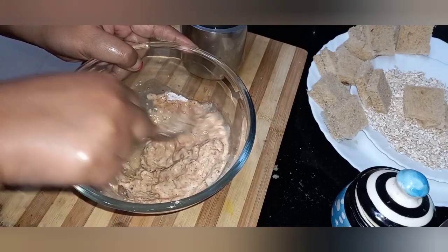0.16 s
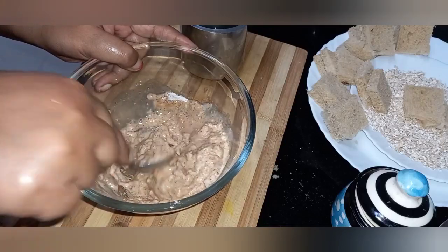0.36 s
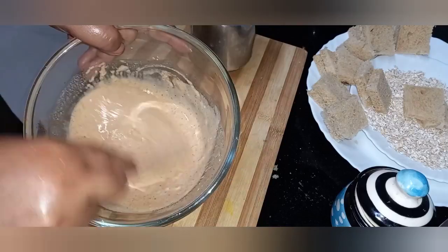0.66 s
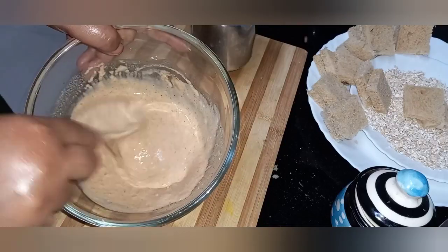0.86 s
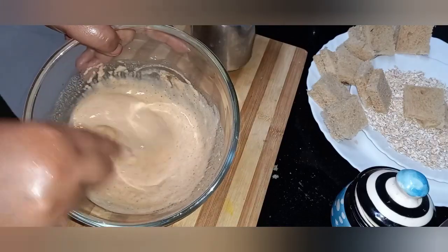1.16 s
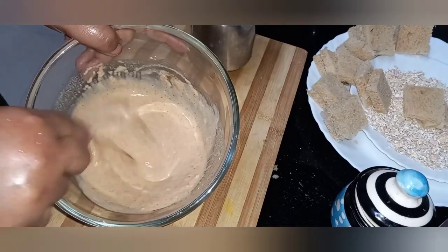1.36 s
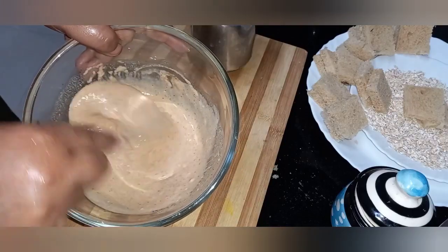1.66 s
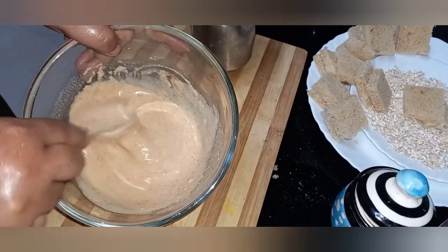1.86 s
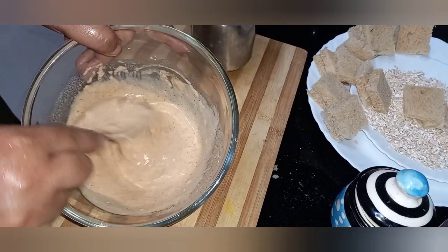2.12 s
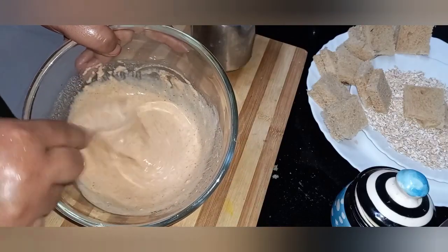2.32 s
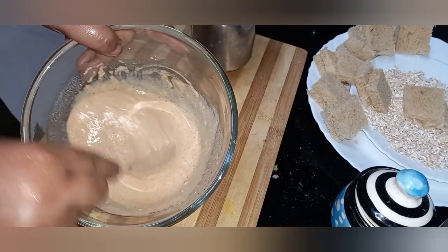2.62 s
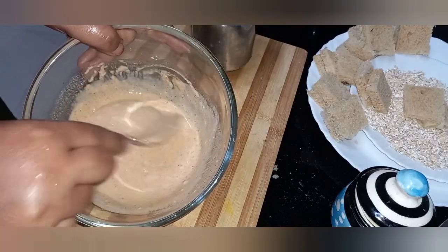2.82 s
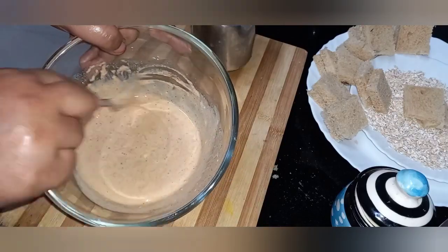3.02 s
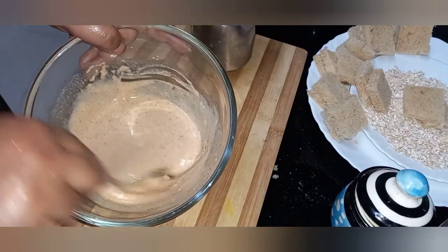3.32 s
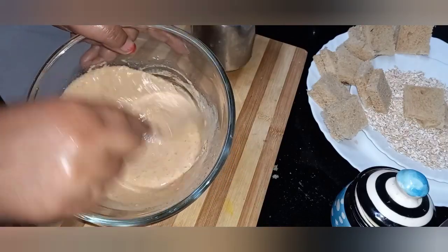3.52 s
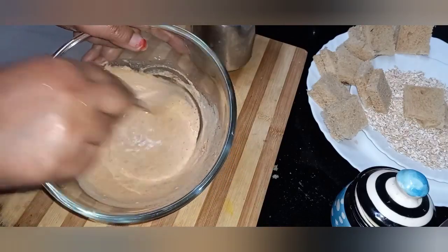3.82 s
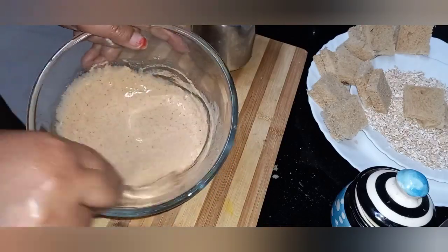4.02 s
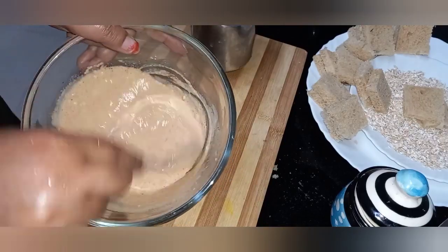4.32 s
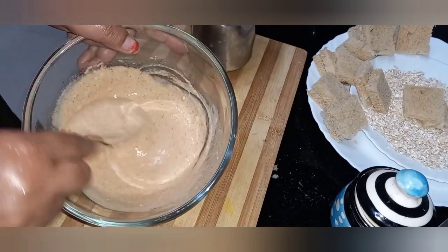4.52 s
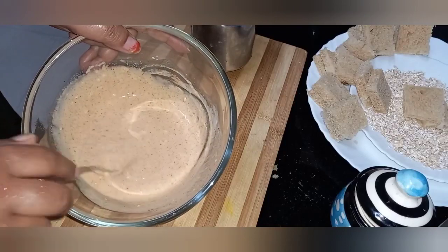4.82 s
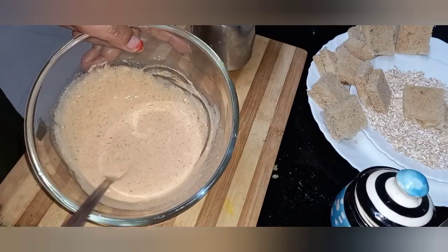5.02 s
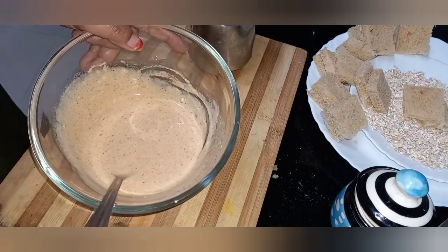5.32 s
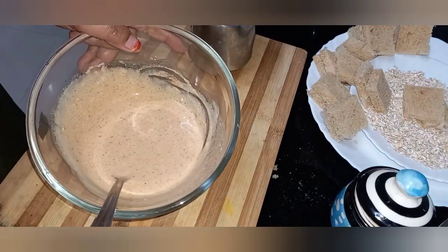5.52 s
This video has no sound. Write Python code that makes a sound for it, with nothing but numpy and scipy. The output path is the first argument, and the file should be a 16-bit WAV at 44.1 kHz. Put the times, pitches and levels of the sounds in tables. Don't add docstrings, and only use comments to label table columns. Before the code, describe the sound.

A close phone-like stereo microphone in a small hard kitchen hears a metal spoon working thin batter in a glass bowl. A sharp clink at 0.05 s is followed by soft sliding hiss and a wet fizz; another knock comes at 0.6 s, where the room tone changes and gets quieter. From 1.0 to 2.7 s strokes fall about every quarter second, each a bright tick with a hollow, quickly damped glass knock, loudest from 2.0 to 2.7 s, with little squelches and rubs between. At 2.96 s a softer blow rings the bare rim. From 3.3 to 4.4 s the stirring is slower and uneven: stick-slip scrapes, light taps, firmer clinks at 4.2 and 4.4 s. Around 4.8 to 4.95 s the spoon rubs and faintly rings the rim while a distant low engine drone swells to its peak. After 5.1 s only faint fan hum and tiny distant clicks remain.

```python
import sys
import numpy as np
from scipy import signal
from scipy.fft import rfft, irfft
from scipy.io import wavfile
from scipy.ndimage import uniform_filter1d

SR = 44100
rng = np.random.default_rng(int(sys.argv[2]) if len(sys.argv) > 2 else 0)


def natural_amplitude(level_db):
    exponent = np.asarray(level_db, float) / 20
    return 10 ** exponent


def to_wav(s):
    ch = np.atleast_2d(s).T
    pcm = np.round(np.clip(ch, -1, 1) * 32767)
    wavfile.write(sys.argv[1], SR, pcm.astype(np.int16))


N = 250265


def evened(x):
    return x / np.sqrt(np.mean(x ** 2) + 1e-20)


def read(points, hz):
    f, value = np.transpose(points)
    return np.interp(np.log(hz + 1), np.log(f + 1), value)


def add(mix, s, sound, pan_db=0):
    part = mix[:, round(s * SR):][:, :len(sound)]
    part += natural_amplitude([[pan_db / 2], [-pan_db / 2]]) * sound[:part.shape[1]]


def resonate(x, hz, width):
    turn = np.exp(2j * np.pi * np.cumsum(hz * np.ones(len(x))) / SR)
    r = np.exp(-np.pi * width / SR)
    return 2 * (turn * signal.lfilter([1 - r], [1, -r], x / turn)).real


def band(x, lo_hz, hi_hz):
    return signal.sosfilt(signal.butter(3, [lo_hz, hi_hz], "band", fs=SR, output="sos"), x)


def mode(hz, db, t60, rise_s=0.00047):
    t = np.arange(SR // 2) / SR
    decay = natural_amplitude(db - 60 * t / t60) * (1 - np.exp(-t / rise_s))
    return decay * np.sin(2 * np.pi * hz * t)


# pitch_hz, level_db per Hz
AIR_EARLY = [(15, -37), (25, -23), (70, -8.5), (252, -21.5), (400, 1), (484, -8.5), (540, -14.5),
             (602, -21.5), (790, -33), (1840, -38), (6410, -40), (7970, -56.5), (9380, -46), (14500, -51),
             (16600, -60.5)]
AIR_LATE = [(25, -52.5), (50, -25), (85, -3.5), (155, -11.5), (220, -19.5), (250, -23.5), (325, -8.5),
            (420, -22), (800, -25.5), (1250, -21), (2000, -35.5), (4400, -34.5), (6500, -27), (7600, -42),
            (15500, -46)]
# pitch_hz, likeness (-1 to 1)
LIKENESS = [(60, 0.91), (180, 0.98), (550, 0.46), (1650, -0.13), (4970, -1), (15000, 1)]
# pitch_hz, left_over_right_db
TILT = [(60, 7), (180, -7.5), (550, -21.5), (1650, -4), (4970, -1), (15000, 1)]
# time_s, change_db
SWELL = [
    (0.54, 2),
    (5.67, 1.5),
]
# pitch_hz, level_db, width_hz
FAN = [(217, -70.5, 2.2), (327, -68, 1.5), (364, -77, 5), (528, -78.5, 59), (757, -75, 15.5),
       (1200, -80, 18)]
EARLY_DB, LATE_DB, CHANGE_S = -54, -62, 0.54
START_S = 0.095


def air():
    frames, hz = N // 256 + 5, np.fft.rfftfreq(1024, 1 / SR)
    a, b, c, d, patches = rng.standard_normal((frames, 513, 5)).T
    patches = uniform_filter1d(patches, size=10, axis=0)
    patches = evened(uniform_filter1d(patches, size=12, axis=1))
    same = read(LIKENESS, hz)[:, None]
    left = a + 1j * b
    right = same * left + np.sqrt(1 - same ** 2) * (c + 1j * d)
    balance_db = np.array([[0.5], [-0.5]])[..., None] * read(TILT, hz)[:, None]
    z = np.array([left, right]) * natural_amplitude(1.4 * patches + balance_db)

    def coloured(colour, db):
        shaped = z * natural_amplitude(read(colour, hz))[:, None]
        return natural_amplitude(db) * evened(signal.istft(shaped, nperseg=1024, noverlap=768)[1][:, :N])

    early, late = coloured(AIR_EARLY, EARLY_DB), coloured(AIR_LATE, LATE_DB)
    t = np.arange(N) / SR
    fan = sum(natural_amplitude(db) * evened(resonate(rng.standard_normal(N), f, width)) for f, db, width in FAN)
    fade_in = np.minimum(t / START_S + 0.23, 1)
    swell = natural_amplitude(np.interp(t, *np.transpose(SWELL)))
    return swell * np.where(t < CHANGE_S, early * fade_in, late + fan)


# time_s, drone_db
ENGINE = [(0.0, -87), (0.14, -62.5), (0.39, -74), (0.61, -86), (2.08, -73.5), (2.16, -47), (2.27, -55.5),
          (3.13, -67), (4.4, -69), (4.69, -42.5), (4.94, -38.5), (5.1, -46), (5.13, -61.5), (5.67, -86)]
DRONE_HZ = 100
FULL_DB, DRONE_SLOPE = -36, 1.14
THUD_DB, THUD_SLOPE = -49, 0.62
ROAR_DB, ROAR_SLOPE = -51, 0.56
BUMP_S, BUMP_DB, BUMP_WIDTH_S = 4.8, -54.5, 0.035


def engine():
    t, noise = np.arange(N) / SR, rng.standard_normal((4, N))
    effort_db = np.interp(t, *np.transpose(ENGINE)) - FULL_DB
    waver = evened(resonate(resonate(noise[0], DRONE_HZ, 32), DRONE_HZ, 32))
    drone = evened(np.sin(2 * np.pi * DRONE_HZ * t) + 0.19 * waver)
    thud = evened(band(noise[1] + 0.13 * noise[2:], 46, 110))
    roar = evened(band(noise[2] + 0.11 * noise[2:], 90, 480))
    bump = natural_amplitude(BUMP_DB) * np.exp(-((t - BUMP_S) / BUMP_WIDTH_S) ** 2)
    return (natural_amplitude(FULL_DB + DRONE_SLOPE * effort_db) * drone
            + (natural_amplitude(THUD_DB + THUD_SLOPE * effort_db) + bump) * thud
            + natural_amplitude(ROAR_DB + ROAR_SLOPE * effort_db) * roar)


# start_s, level_db, pitch_hz
FAR_CLICKS = [
    (3.985, -62, 4800),
    (5.052, -52.5, 11600),
    (5.053, -55, 5410),
    (5.19, -73, 4400),
    (5.299, -76, 4460),
    (3.16, -68.5, 4430),
    (5.309, -66, 12300),
    (5.46, -62, 4760),
    (5.55, -65.5, 4540),
]


def far_clicks():
    out, t = np.zeros((2, N)), np.arange(SR // 4) / SR
    decay = natural_amplitude(-60 * t / 0.28) + natural_amplitude(-60 * t / 0.027)
    for (s, db, hz), noise in zip(FAR_CLICKS, rng.standard_normal((len(FAR_CLICKS), 2, len(t)))):
        for side, pan_db in zip(noise, (40, -40)):
            tail = evened(band(side, 0.8 * hz, 1.22 * hz)) * decay
            add(out, s, natural_amplitude(db - 25) * tail, pan_db)
    return out


# pitch_hz, t60_s
KITCHEN = [(200, 0.44), (600, 0.37), (1000, 0.38), (2000, .38), (3500, 0.32), (6000, 0.37), (9000, .3),
           (16000, 0.12)]
# pitch_hz, level_db
WET = [(300, -8), (800, -8.5), (1300, -12), (2000, -12.5), (3000, -11), (5000, -16), (8000, -12.5),
       (11000, -11), (15000, -10)]


def kitchen(x):
    places = np.arange(200, SR - 20, 20)
    out, turn = np.zeros((2, N)), np.pi * 3.1 * np.arange(N) / SR
    for k in range(3):
        echoes = np.zeros((2, SR))
        when = places + rng.integers(0, 20, (2, len(places)))
        np.put_along_axis(echoes, when, rng.choice([-1., 1.], (2, len(places))), 1)
        hz, t, z = signal.stft(echoes, SR, nperseg=128)
        z = z * natural_amplitude(-60 * t / read(KITCHEN, hz)[:, None])
        z = z / np.sqrt((abs(z) ** 2).sum((0, 2), keepdims=True))
        z = z * natural_amplitude(read(WET, hz))[:, None]
        tail = signal.istft(z, SR, nperseg=128)[1] / 30
        share = np.sqrt(2 / 3) * np.cos(turn + np.pi * k / 3)
        out += signal.fftconvolve((x * share)[None], tail, axes=1)[:, :N]
    return out


# pitch_hz, lead_radians
LEAD = [(300, .2), (700, .6), (1500, .8), (3000, .8), (6000, 1.3), (9000, 1.9), (15000, 1.9)]


def ports(x):
    half = 0.5j * read(LEAD, np.fft.rfftfreq(N, 1 / SR))
    return irfft(rfft(x) * np.exp([half, -half]), N)


# start_s, length_s, fizz_db, treble_db, peak_place (share of length)
SQUELCH = [
    (0.0, 0.059, -52.5, -71, 0.5),
    (0.542, 0.0354, -72, -54.5, 0.32),
    (0.945, 0.08, -65, -62, 0.37),
    (1.045, 0.12, -58.5, -56, 0.091),
    (1.291, 0.18, -60, -64.5, 0.039),
    (1.656, 0.084, -57, -60, 0.99),
]
SQUELCH_ENDS_DB = -22


def squelch():
    out = np.zeros((2, N))
    for s, length, fizz_db, treble_db, peak in SQUELCH:
        u = np.arange(9600) / SR / length
        swell = natural_amplitude(np.interp(u, [0, peak, 1], [SQUELCH_ENDS_DB, 0, SQUELCH_ENDS_DB]))
        ends = np.clip(np.minimum(u, 1 - u) / 0.045, 0, 1)
        snaps = natural_amplitude(rng.exponential(1, len(u))) * rng.standard_normal(len(u))
        fizz = natural_amplitude(fizz_db) * evened(band(snaps, 2800, 7400))
        treble = natural_amplitude(treble_db) * evened(band(snaps, 7800, 15600))
        add(out, s, (fizz + treble) * swell * ends, 1.5)
    return out


# pitch_hz, level_db per Hz
HISS = [(500, -16.5), (900, -1.5), (1600, -4), (2600, -0.5), (3600, -8), (5500, -13.5), (7000, -21),
        (10000, -31.5), (16000, -37)]


def slide(db, hz, hiss_db):
    grip = natural_amplitude(3 * evened(uniform_filter1d(rng.standard_normal(len(db)), size=70)))
    slips = grip * natural_amplitude(1.5 * rng.exponential(1, len(db))) * rng.standard_normal(len(db))
    hiss = irfft(rfft(slips) * natural_amplitude(read(HISS, np.fft.rfftfreq(len(db), 1 / SR))), len(db))
    sing = resonate(resonate(slips, hz, 470), hz, 470)
    return natural_amplitude(db) * evened(sing) + natural_amplitude(hiss_db) * evened(hiss)


# start_s, length_s, end_db, singing_hz, hiss_db
LEAD_INS = [
    (1.03, 0.093, -69, 1600, -59.5),
    (3.3, 0.17, -51.5, 1670, -48.5),
    (3.66, 0.047, -59.5, 1630, -68),
    (4.128, 0.11, -44, 1914, -53.5),
]
# start_s, length_s (of the whole fade),
# start_db, singing_hz, hiss_db
SLIDE_OFFS = [
    (0.001, 0.43, -63, 1610, -58),
    (0.0521, 0.19, -51, 1910, -37),
    (0.5381, 0.54, -54, 1820, -49),
    (0.6001, 0.026, -46, 1690, -37),
    (3.0301, 0.29, -52, 1894, -51),
    (3.4501, 0.086, -46, 1735, -48),
    (3.7301, 0.74, -57.5, 1710, -48.5),
    (4.2201, 0.029, -41.5, 1839, -43),
]
# start_s, peak_db, singing_hz, hiss_db, length_ms
RUBS = [(0.826, -49, 2810, -55.5, 31), (1.0898, -49.5, 3000, -67, 33), (1.338, -42, 2800, -44, 33),
        (1.355, -28, 1700, -55, 14.7), (1.584, -27.5, 1920, -46, 22), (1.603, -27.5, 1870, -41, 16.8),
        (1.606, -36, 3060, -46, 14), (1.604, -37, 6800, -55, 15), (3.3571, -30, 1693, -52, 28),
        (3.442, -36, 1610, -35, 24), (3.434, -36, 2500, -48, 8), (3.402, -30, 1700, -60, 8),
        (3.385, -33, 1700, -60, 12), (3.4465, -43, 1800, -51, 13), (3.503, -38, 1900, -59, 14),
        (3.7378, -32, 1510, -39.5, 16), (3.751, -27.5, 2700, -41.5, 9.7), (3.7868, -30, 1600, -44, 10),
        (3.795, -28, 1900, -45, 11), (3.788, -35, 2650, -55, 10), (3.789, -38, 5600, -58, 14),
        (3.8382, -32, 1840, -54, 22), (3.741, -34, 2750, -55, 9), (4.1572, -26.5, 1970, -54.5, 7.9),
        (4.1685, -32, 1940, -57, 5.9), (4.1903, -43, 2850, -49.5, 68), (4.2119, -37, 1715, -33, 22),
        (4.8256, -29, 1851, -38, 19), (4.841, -23.5, 1337, -36, 12.7), (4.9432, -37, 1573, -56.5, 52)]
PRESS_DB, LEAVE_DB = -12.5, -56


def scrapes():
    out = np.zeros((2, N))
    strokes = [(row, True) for row in LEAD_INS] + [(row, False) for row in SLIDE_OFFS]
    for (s, length, db, hz, hiss_db), pressing in strokes:
        u = np.arange(8820) / SR / length
        ends = np.clip(np.minimum(u, 1 - u) / 0.051, 0, 1)
        done = np.minimum(u, 1)
        grip_db = PRESS_DB * (1 - done) ** 4.9 if pressing else LEAVE_DB * done ** 0.91
        add(out, s, ends * natural_amplitude(grip_db) * slide(db + 0 * u, hz, hiss_db), 1.5)
    for s, db, hz, hiss_db, ms in RUBS:
        u = np.arange(4096) / SR / (ms / 1000)
        swell = abs(np.sin(np.pi * np.minimum(u, 1) ** 0.74)) ** 0.55
        add(out, s, swell * slide(db - 14 + 0 * u, hz, hiss_db), 1.5)
    return out


# start_s, level_db, pitch_hz, t60_s
NOTES = [(0.7499, -37.5, 1006, .07), (0.7668, -30.5, 995, 0.065), (2.2298, -18, 1200, 0.048),
         (2.259, -20, 1915, .05), (4.4108, -21, 2850, .018), (2.2585, -23, 2850, .014),
         (2.478, -26, 2800, .014), (2.6976, -28, 2750, .012), (2.0373, -28, 2750, .012),
         (3.8325, -40, 4000, .02), (2.962, -47, 9500, 0.19), (2.9625, -44, 5130, .4),
         (2.963, -46, 5215, .25), (3.2695, -36, 5150, .04), (2.963, -52, 9800, .15), (3.27, -54, 6370, .03),
         (4.943, -49, 11300, .04)]


def notes():
    out = np.zeros((2, N))
    for s, db, hz, t60 in NOTES:
        add(out, s, mode(hz, db, t60))
    return out


# start_s, level_db, brightness_db per octave, ring_share (of free t60)
RINGS = [
    (2.961, -43.5, -3, 0.85),
    (3.269, -50.5, 1.5, 0.33),
    (4.819, -42.5, 5.5, 1.0),
    (4.82, -40.5, 4.5, 0.27),
    (4.835, -52, 9, 1),
    (4.851, -46, 4, 1),
    (4.944, -54, 3, 0.54),
    (4.963, -58, 4, 0.77),
    (3.27, -48, 3, 1),
]
# pitch_hz, level_db, t60_s
RIM = [(750, -11, 0.32), (1330, -17, 0.088), (1850, -0.5, 0.28), (2400, -8, 0.075), (2790, -14, .15),
       (3320, -5.5, 0.39), (5116, -2.5, 0.4), (5200, -5, 0.2), (3560, -3, 0.11), (7335, -4, 0.1),
       (6450, -8, .08), (10265, -9, 0.094), (11200, -15, .06), (12760, -13, .07)]
WAVER_DB = 2.3


def rings():
    out = np.zeros((2, N))
    lucks = 1.2 * rng.standard_normal((len(RINGS), 2, len(RIM)))
    for (s, db, bright_db, share), luck in zip(RINGS, lucks):
        for (f, d, t60), u, v in zip(RIM, *luck):
            wander = evened(uniform_filter1d(rng.standard_normal(SR // 2), size=400))
            level_db = db + d + bright_db * np.log2(f / 3000)
            sound = mode(f, level_db + u - 3, share * t60)
            for split_hz, w in ((-35, v), (22.5, -u), (60.5, -v)):
                partner_hz = f + split_hz * np.sqrt(f / 3000) + 4 * w
                sound = sound + mode(partner_hz, level_db + w - 4.5, 0.74 * share * t60)
            add(out, s, natural_amplitude(WAVER_DB * wander) * sound, u - v)
    return out


# pitch_hz, level_db
GLASS = [(2850, -6.5), (3600, -4), (4010, -3.5), (4350, -6.5), (4770, -2), (5030, -2.5), (5460, -4),
         (6000, -6.5), (6500, -6)]
GLASS_DB, GLASS_T60, GLASS_LUCK_DB = -20, 0.03, 3.5


def clinks():
    out = np.zeros((2, N))
    for (s, db, hz, _), luck in zip(TICKS, rng.standard_normal((len(TICKS), len(GLASS)))):
        clink = 0
        for (f, d), u in zip(GLASS, luck):
            distance_db = 8 * abs(np.log2(f / hz))
            clink = clink + mode(f, db + GLASS_DB + d + GLASS_LUCK_DB * u - distance_db, GLASS_T60)[:4096]
        add(out, s, clink, 1.5)
    return out


# start_s, peak_db, pitch_hz, treble_db
TICKS = [(0.05, -10.5, 3560, -12), (0.5833, -18, 3130, -12.5), (1.0051, -28.5, 5800, -16.5),
         (1.258, -21, 4400, -13.5), (1.5259, -18.5, 6070, -11.5), (1.73, -46, 4500, -18),
         (1.7336, -27.5, 6700, -12.5), (1.7841, -13, 4770, -9.5), (1.9969, -26.5, 6360, -7.5),
         (2.037, -8.5, 5100, -8), (2.0373, -17, 3640, -20), (2.6976, -15, 5800, -20),
         (2.258, -11, 5900, -20), (2.2574, -3, 5180, -10), (2.4772, -6.5, 5120, -8),
         (2.664, -39.5, 5100, -10), (2.697, -8.5, 5100, -8.5), (2.9624, -16, 6180, -6.5),
         (3.269, -27, 5290, -9), (3.4426, -17, 2500, -19), (3.5478, -34.5, 6300, -12),
         (4.2121, -14, 2510, -21), (4.328, -29.5, 3580, -13), (4.4106, -11, 4760, -6),
         (4.823, -29, 5200, -3), (4.944, -42, 3500, -8), (0.7192, -32, 6900, 5)]
# start_s, peak_db, pitch_hz
DULL_TICKS = [(0.243, -50.5, 2780), (0.365, -42, 6170), (0.766, -34, 6020), (0.9584, -50, 6500),
              (0.9718, -39.5, 6340), (1.442, -50.5, 4960), (1.542, -22, 5560), (2.4455, -24.5, 2870),
              (3.3444, -37.5, 3200), (3.7131, -32.5, 4040), (2.2266, -30.5, 2500), (3.404, -48, 3000),
              (1.3574, -37, 2780), (1.591, -38, 2800), (3.7245, -30, 4100), (0.0503, -23, 6600),
              (1.7845, -17, 6500), (3.444, -34, 6900), (4.6188, -37.5, 6410), (4.7404, -50, 6350)]
# start_s, peak_db, pitch_hz
SNAPS = [(0.0081, -49, 6550), (0.0303, -51.5, 6960), (0.2951, -63, 6450), (0.395, -58, 7040),
         (0.7071, -31.5, 5730), (0.716, -37.5, 7100), (1.0541, -46, 5470), (1.0745, -54, 2910),
         (1.399, -57, 6800), (1.4785, -48, 6000), (1.488, -55, 5000), (2.218, -36, 6630),
         (2.2215, -37, 6720), (2.2294, -32, 3070), (2.4372, -40.5, 4245), (2.9425, -43, 6800),
         (3.5918, -38, 6740), (3.8293, -57, 3680), (3.868, -41, 2493)]
DULL_TREBLE_DB, SNAP_TREBLE_DB = -41.5, -1
TICK_FOCUS, DULL_FOCUS, SNAP_FOCUS = 1.9, 17, 6.9
CHATTER_S = 0.0016


def ticks(chatter):
    out, t = np.zeros((2, N)), np.arange(1500) / SR
    rows = [(*r, TICK_FOCUS) for r in TICKS]
    rows += [(*r, DULL_TREBLE_DB, DULL_FOCUS) for r in DULL_TICKS]
    rows += [(*r, SNAP_TREBLE_DB, SNAP_FOCUS) for r in SNAPS]
    for (s, db, hz, treble_db, focus), noise in zip(rows, rng.standard_normal((len(rows), len(t)))):
        contact = (t == 0) + chatter * noise * np.exp(-t / CHATTER_S)
        body = band(contact + focus * resonate(contact, hz, 1100), min(2900, 0.58 * hz), 7560)
        top = 0.45 * band(contact, 5800, 13000) + 3.2 * resonate(contact, 10650, 3300)
        tick = body / abs(body).max() + natural_amplitude(treble_db + 5.5) * top / abs(top).max()
        add(out, s, natural_amplitude(db) * tick, 2.5)
    return out


# start_s,
# low_mode_db, upper_mode_db, low_mode_hz, left_over_right_db
KNOCKS = [(0.049, -33.5, -27, 800, 9.5), (0.583, -29, -12.5, 1115, 2.5), (0.752, -36, -34, 1076, -2),
          (0.766, -35.5, -30, 983, -1), (1.006, -27, -29, 1165, -2), (1.258, -22.5, -26.5, 1124, -2.5),
          (1.525, -24, -23.5, 1074, -3.5), (1.541, -21, -20.5, 1033, -1.5), (1.732, -43.5, -42, 1010, 2.5),
          (1.784, -12.5, -12, 1001, -0.5), (2.037, -14.5, -12, 1000, -2.5), (2.229, -16.5, -34, 1165, 2),
          (2.258, -8, -9, 999, 0), (2.444, -41, -34, 960, 3), (2.477, -9, -10.5, 990, -2),
          (2.6975, -9, -9, 1000, -2.5), (2.961, -28, -30.5, 851, -6),
          (3.265, -40.5, -54, 960, 2), (3.308, -34.5, -36.5, 1015, -2.5), (3.345, -44, -53, 1060, -15),
        (3.4428, -28, -26.5, 1072, 6), (3.5095, -49, -30, 1027, 0.1), (3.5475, -59, -27, 1120, 4),
        (3.667, -43, -54, 917, 3), (3.713, -35, -30, 1200, 1), (3.7225, -36, -30, 1274, 1),
        (3.7248, -41, -23.5, 1270, 2), (3.787, -38, -40, 1165, 2), (3.832, -30.5, -23, 978, -0.5),
        (4.212, -29, -17, 1120, 4), (4.327, -56, -24.5, 1100, 0), (4.41, -17, -14, 987, -3.5),
        (4.741, -28.5, -33.5, 1024, -2), (4.818, -26.5, -47, 1220, -6)]
# pitch_ratio, level_db
NEIGHBOURS = [(0.9, -9), (1.153, -3), (0.79, -10), (1.14, -12)]
PAIR_HZ = 1370
LOW_T60, UPPER_T60 = 0.019, 0.019


def knocks():
    out, rows = np.zeros((2, N)), KNOCKS
    detunes = rng.uniform(0.988, 1.012, (len(rows), 4))
    for (s, low_db, upper_db, low_hz, pan_db), detune in zip(rows, detunes):
        upper_hz = PAIR_HZ ** 2 / low_hz
        glass = mode(low_hz, low_db, LOW_T60) + mode(upper_hz, upper_db, UPPER_T60)
        for (ratio, db), w in zip(NEIGHBOURS[:2], detune[:2]):
            glass += mode(low_hz * ratio * w, low_db + db, 0.019)
        for (ratio, db), w in zip(NEIGHBOURS[2:], detune[2:]):
            glass += mode(upper_hz * ratio * w, upper_db + db, 0.029)
        glass = band(band(glass, 748, 6300), 748, 6300)
        push = mode(420, low_db - 22, 0.017) + mode(78, low_db - 36.5, 0.31, rise_s=0.02)
        add(out, s, glass + push, pan_db)
    return out


def scene():
    bowl = knocks() + clinks() + notes() + rings() + scrapes() + squelch()
    room = kitchen((bowl + natural_amplitude(3) * ticks(chatter=0)).mean(0))
    return ports(bowl + ticks(chatter=0.16)) + room + far_clicks() + air() + engine()


def band_limit(x):
    return signal.sosfilt(signal.butter(12, 16810, fs=SR, output="sos"), x)


# pitch_hz, level_db
MIC = [(30, -19.5), (55, -7.5), (80, 0.5), (7100, 1.03), (7500, -3), (8400, 1), (9500, 1.5), (15600, 0.5)]
EDGE_HZ = 15850


def record(dry):
    hz = np.fft.rfftfreq(N, 1 / SR)
    edge_db = -np.maximum(hz - EDGE_HZ, 0) / 25
    heard = irfft(rfft(dry) * natural_amplitude(read(MIC, hz) + edge_db), N)
    return band_limit(np.clip(heard, -1, 1))


dry = scene()
out = record(dry)
to_wav(out)
```